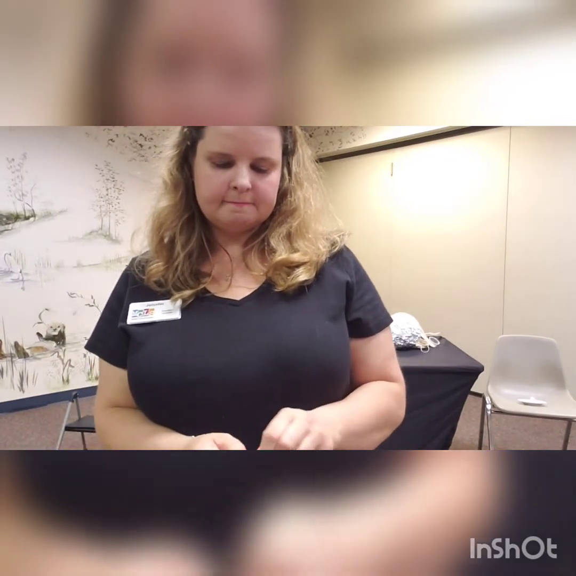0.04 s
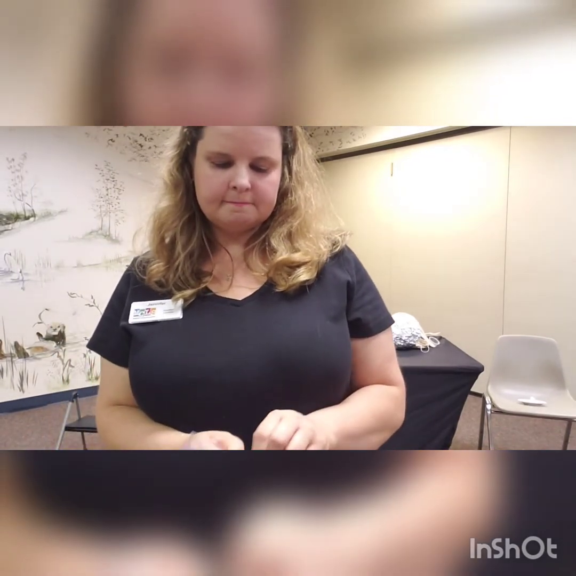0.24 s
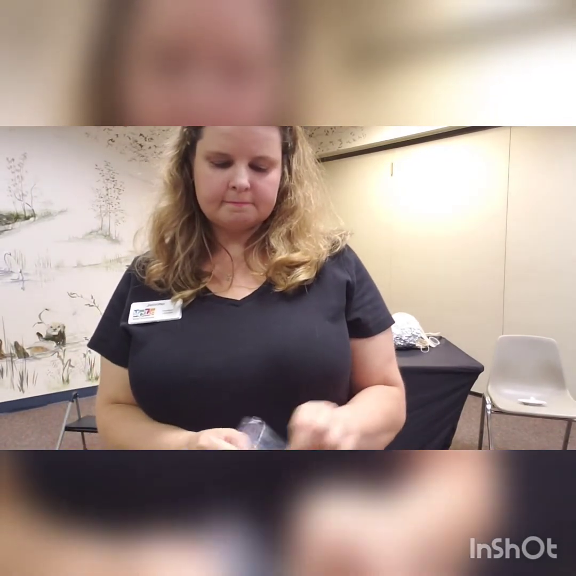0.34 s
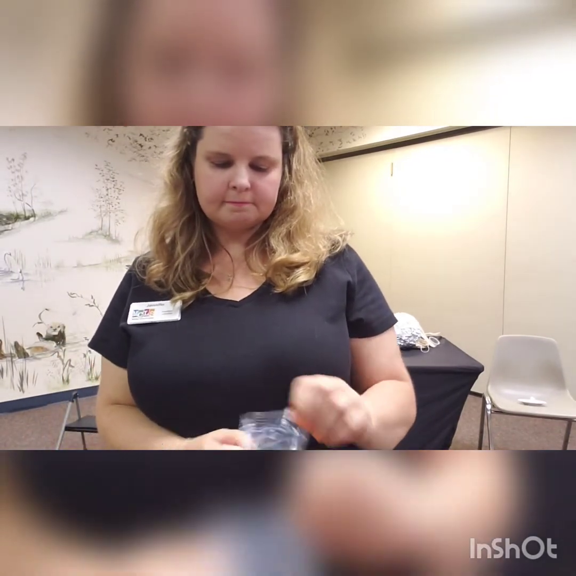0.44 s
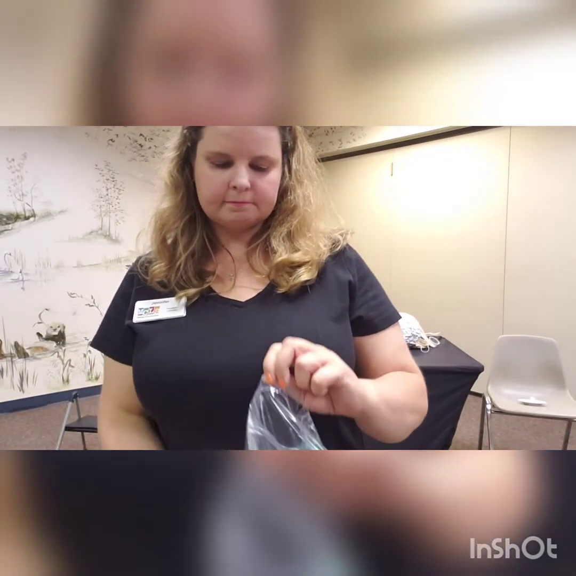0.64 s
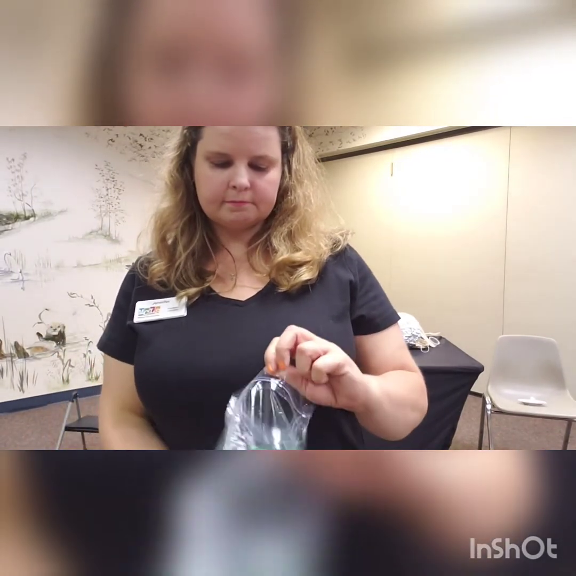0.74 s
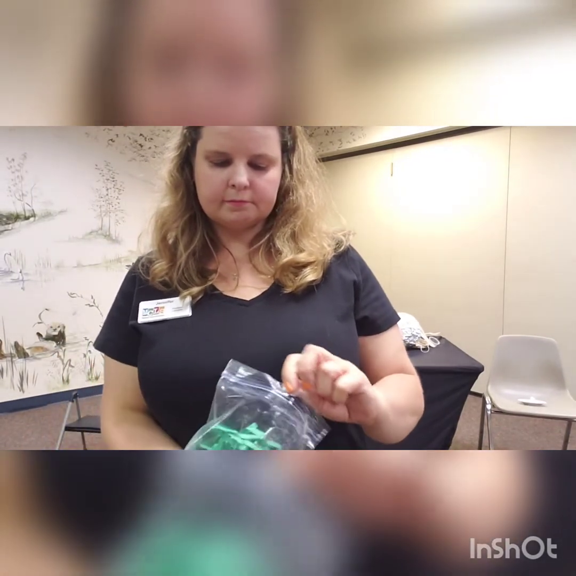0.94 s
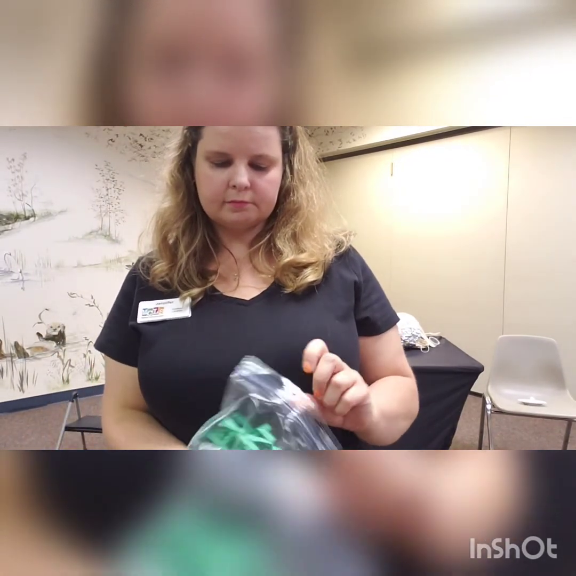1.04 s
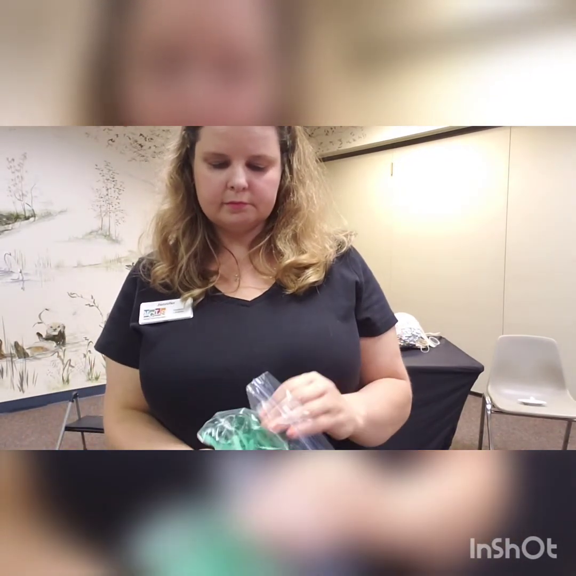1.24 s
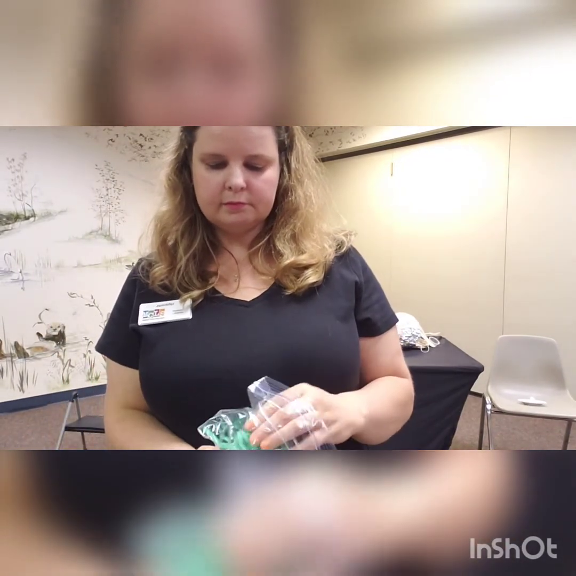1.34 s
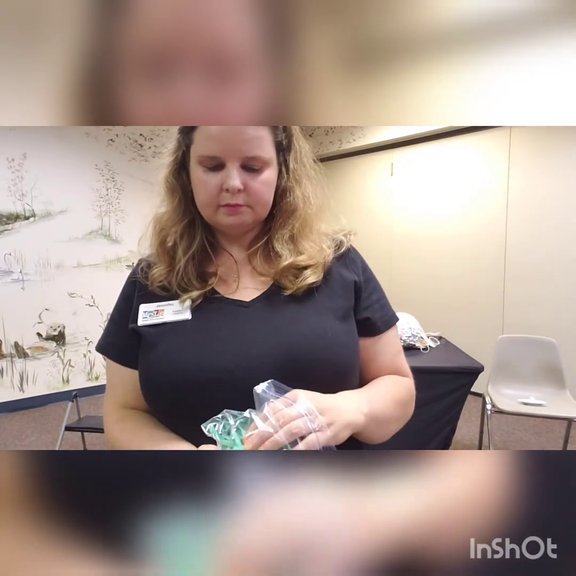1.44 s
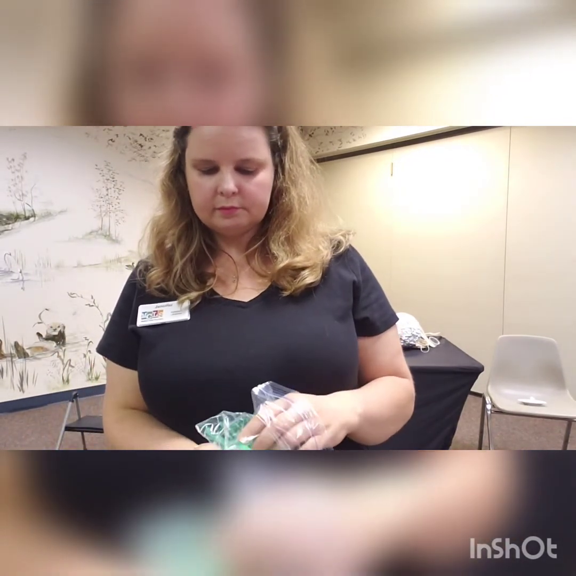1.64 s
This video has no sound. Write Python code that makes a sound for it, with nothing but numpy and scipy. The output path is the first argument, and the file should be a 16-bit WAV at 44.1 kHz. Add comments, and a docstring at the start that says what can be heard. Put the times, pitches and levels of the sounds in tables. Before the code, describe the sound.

A plastic bag is pulled open, its seal parting in a quick run of sharp snaps. Then a hand digs in, and the plastic crinkles over softly rustling shredded paper, close to the microphones in a small room.

```python
"""The seal of a plastic bag of shredded paper, pulled open by hand, parts in a quick run of sharp snaps.
Then a hand digs in: the film ticks, crinkles and squeaks over a soft rustle of paper strips.
The bag is close to a stereo pair of microphones, a little to the right, in a small room.
The room rings briefly and its ventilation rumbles underneath."""
import sys
import numpy as np
from scipy import signal
from scipy.fft import rfft, irfft, next_fast_len
from scipy.io import wavfile
from scipy.ndimage import map_coordinates

SR = 44100
rng = np.random.default_rng(int(sys.argv[2]) if len(sys.argv) > 2 else 0)


def transcribe(u):
    """Save the signal u as a 16-bit wav file named by the first command-line argument.

    u: samples, shape (n,) or (channels, n), limited to [-1, 1]; the rate is SR.
    q: integer samples, one column per channel.
    """
    v = np.clip(np.atleast_2d(u).T, -1, 1)
    q = np.round(v * 32767).astype(np.int16)
    wavfile.write(sys.argv[1], SR, q)


N = 74970

# rumble of the ventilation: f/Hz, level/dB
VENT_SPECTRUM = [(28, -26), (43, 2.5), (90, -1.5), (135, -6.5), (300, -19), (1500, -47.5), (4000, -53),
                 (7500, -44), (15000, -53)]
# reverberation time of the room: f/Hz, t60/s
ROOM_T60 = [(250, 0.53), (14000, 0.38)]
# how alike ventilation, room tail and bag are at the two microphones: f/Hz, likeness (1 = identical)
VENT_LIKENESS = [(60, 0.99), (250, 0.9), (5000, 0.16)]
ROOM_LIKENESS = [(500, 0.46), (1500, 0.62), (4000, 0.1)]
BAG_LIKENESS = [(500, 0.98), (1500, 0.55), (4000, 0.22), (12000, 0.2)]
# left microphone relative to the right: f/Hz, level/dB
LEFT_OVER_RIGHT = [(200, -1.45), (2300, -3), (8500, -4), (13000, 0.7)]
# a finger sliding on the film: t/s, f/Hz, level/dB
SQUEAK_GLIDE = [(1.58, 11900, -69.5), (1.635, 12830, -48.5), (1.69, 14400, -68)]
# fingers brushing the film: t/s, half length/s, level/dB
BRUSH_STROKES = [(1.245, 0.0095, -54), (1.343, 0.008, -58.5)]
# handling of bag and paper: t/s, body level/dB, hiss over body/dB
RUSTLE_LEVELS = [(0, -71.5, 0.5), (.18, -79.5, -4.5), (.738, -110, -15), (.752, -61.5, -2.5),
                 (.825, -57.5, 3.5), (.89, -58, 7), (.995, -69.5, 1), (1.02, -60, -1), (1.122, -81, 10.5),
                 (1.135, -65, -3), (1.16, -56.5, 3), (1.21, -63.5, 2.5), (1.25, -56, -0.5), (1.28, -70, 6),
                 (1.35, -62, 6), (1.49, -69.5, 6), (1.55, -70.5, 11.5), (1.61, -64.5, 10.5), (1.7, -58, 4)]
# low body and high hiss of the paper strips: f/Hz, level/dB
PAPER_BODY = [(60, -8.5), (135, 18.5), (330, 7), (600, 5), (950, 3), (1650, 5), (2400, -1), (3800, -13.5),
              (15000, -43)]
PAPER_HISS = [(500, -21.5), (2500, -4), (7000, -1), (10000, -6.5), (12500, 1), (15500, -4)]
# creases of the film flipping over: t/s, level/dB, treble/dB
CREASE_FLIPS = [(.0970, -49, 16), (0.4809, -17.5, -13.5), (.7480, -30.5, 10), (0.81, -20, -13),
                (0.8339, -34.5, 16), (0.876, -26, -9), (.9535, -27.5, 10), (1.0115, -19.5, -3.5),
                (1.0470, -36, 12.5), (1.2515, -24, 5.5), (1.2540, -27, -9), (1.3003, -31, 8),
                (1.5057, -39, 15), (1.5495, -35, 8.5), (1.5710, -33, 11.5), (1.6050, -31, -3)]
# colour of the film, slack and pulled taut: f/Hz, level/dB
SLACK_FILM = [(150, -11), (400, -3), (900, -5), (1600, -1), (14000, -4.5)]
TAUT_FILM = [(80, -31.5), (200, -12), (380, -5.5), (720, 0), (1150, -3.5), (2400, 0), (4500, -1.5),
             (15500, -5)]
# resonances of the bag, slack and pulled taut: f/Hz, level/dB, t60/s
SLACK_MODES = [(1580, -27, .02), (2350, -29, .025), (3650, -27, .012)]
TAUT_MODES = [(706, -58.5, 0.3), (2315, -37, 0.071)]
# fine crackle while the seal is pulled: t/s, level/dB
PULL_LEVELS = [(.190, -100), (.192, -53), (.202, -33), (.211, -52.5), (.225, -36.5), (.255, -47),
               (.287, -43), (.325, -71.5), (.362, -52.5), (.40, -35.5), (.44, -56), (.53, -51.5),
               (.6, -104)]
# the seal parting: t/s, level/dB, bass/dB, treble/dB
SEAL_SNAPS = [(.1963, -11, -19, 18.5), (.2023, 2.5, -5, 3), (.2040, 4, -4, -5.5), (.2083, -6, -3.5, 7),
              (.2304, -8.5, 0.5, 2.5), (.2686, -6, 7, -2), (.2712, -6.5, 8.5, 7), (.2892, 2, -13, -2.5),
              (.2963, -7, 3, 2), (.3101, -2.5, 3.5, 9), (.3123, -1.5, 5, -1.5), (.3160, -7, 5, -1.5),
              (.3340, -6, 2, 3), (.3413, -9.5, 9.5, 4.5), (.3537, -20, 5, -5.5), (.3630, -8.5, 0, 9.5),
              (.3729, -6, -6, -3), (.3839, -8, -2, -1), (.3912, -11.5, -11, 2.5), (.4213, -26.5, 9, 19)]

STRAIN_S, CRACK_S, QUIVER_S = 0.0012, 0.00032, 0.0027  # time constants of a bright click
STRAIN_DB, QUIVER_DB = -5.5, -1  # relative to the crack
DULL_RING = 0.15  # dB of extra ring for each dB of treble that a click lacks


def amp(db):
    """Decibels to gain."""
    return 10 ** (np.asarray(db) / 20)


def unit(x):
    """Scaled to rms 1."""
    return x / np.sqrt(np.mean(x ** 2) + 1e-20)


def along(points, hz):
    """(f/Hz, value) points read on a log frequency axis."""
    f, values = np.transpose(points)
    return np.interp(np.log(hz + 1), np.log(f + 1), values)


def curves(rows):
    """One value per sample for each column after the time."""
    times, *columns = np.transpose(rows)
    return [np.interp(np.arange(N) / SR, times, column) for column in columns]


def wobble(rate):
    """A smooth random curve, rate knots a second."""
    return map_coordinates(rng.standard_normal(N), [np.arange(N) * rate / SR])


def filtered(x, response):
    """x through a filter with the gain response(hz)."""
    n = x.shape[-1]
    size = next_fast_len(n + SR // 4)
    return irfft(rfft(x, size) * response(np.fft.rfftfreq(size, 1 / SR)), size)[..., :n]


def minimum_phase(db, size=2048):
    """The shortest impulse response with the gain db(hz)."""
    cepstrum = irfft(np.log(amp(db(np.fft.rfftfreq(size, 1 / SR)))))
    cepstrum[1:size // 2] *= 2
    cepstrum[size // 2 + 1:] = 0
    return irfft(np.exp(rfft(cepstrum)))


def spread(pair, likeness):
    """Two unrelated signals mixed to left and right with the given likeness."""
    turn = lambda hz: np.arccos(np.clip(along(likeness, hz), -1, 1)) / 2
    mid, side = filtered(pair, lambda hz: np.array([np.cos(turn(hz)), np.sin(turn(hz))]))
    return np.array([mid + side, mid - side])


def burst(decay_s, size=2048):
    """Two unrelated dying bursts starting mid-buffer, each with a flat spectrum and energy 1."""
    noise = rng.standard_normal((2, size)) * np.exp(-np.arange(size) / SR / decay_s)
    spectrum = rfft(np.pad(noise, ((0, 0), (size, 0))))
    return irfft(np.exp(1j * np.angle(spectrum)))


def narrow_noise(hz, width_hz):
    """Stereo noise of rms 1 in a band around hz (one value per sample)."""
    flutter = np.array([wobble(2 * width_hz) + 1j * wobble(2 * width_hz) for _ in range(2)])
    carrier = np.exp(2j * np.pi * np.cumsum(hz) / SR)
    return unit(spread(np.real(flutter * carrier), BAG_LIKENESS))


def ventilation(air_db=-52.5, hum_hz=45, hum_db=-60):
    """Room tone: a steady low rumble with a trace of hiss, and the fan's slightly unsteady hum."""
    air = spread(rng.standard_normal((2, N)), VENT_LIKENESS)
    rumble = unit(filtered(air, lambda hz: amp(along(VENT_SPECTRUM, hz))))
    hum = unit(np.sin(2 * np.pi * hum_hz * np.arange(N) / SR + wobble(2)))
    return amp(air_db) * rumble + amp(hum_db) * hum


def room(x, tail_db=-9.5, build_s=0.002, early_db=-16.5, reflections=8):
    """Table and walls send a few early reflections to the microphones, with a diffuse tail."""
    hz, t, noise = signal.stft(rng.standard_normal((2, SR * 3 // 4)), SR, nperseg=256)
    decay = amp(-60 * t / along(ROOM_T60, hz)[:, None])
    tail = signal.istft(noise * decay, SR, nperseg=256)[1]
    build_up = 1 - np.exp(-np.arange(tail.shape[1]) / SR / build_s)
    response = spread(tail, ROOM_LIKENESS) * build_up
    response *= amp(tail_db) / np.linalg.norm(response[0])
    for channel in response:
        arrivals = (rng.uniform(.002, .025, reflections) * SR).astype(int)
        channel[arrivals] += amp(early_db) / np.sqrt(reflections)
    return signal.fftconvolve(x, response, axes=1)[:, :N]


def finger_squeak():
    """Skin sticks and slips on the film: a thin, rising band of noise."""
    hz, level_db = curves(SQUEAK_GLIDE)
    sliding = np.arange(N) / SR > SQUEAK_GLIDE[0][0]
    return sliding * amp(level_db) * narrow_noise(hz, width_hz=1500)


def finger_brushes(centre_hz=5690):
    """Fingers brush the film: short, bright scrapes that swell and fade."""
    t = np.arange(N) / SR
    strokes = sum(amp(db) * np.exp(-((t - at_s) / half_s) ** 2) for at_s, half_s, db in BRUSH_STROKES)
    return strokes * narrow_noise(np.full(N, centre_hz), width_hz=1000)


def crackle(spectrum, per_s, scatter_db, clump_db):
    """Dense tiny cracks of uneven size that come in clumps, rms 1."""
    sizes = amp(scatter_db * np.minimum(rng.exponential(size=N), 3) + clump_db * wobble(90))
    hits = (rng.random(N) < per_s / SR) * sizes * rng.standard_normal((2, N))
    colour = minimum_phase(lambda hz: along(spectrum, hz))
    return unit(signal.fftconvolve(spread(hits, BAG_LIKENESS), colour[None], axes=1)[:, :N])


def film_clicks(rows, film, modes, pitch_scatter=0, ring_samples=8192):
    """The film strains, cracks and quivers, and the bag rings; dull clicks last longer and ring more."""
    out = np.zeros((2, N + SR))
    t = np.arange(ring_samples) / SR
    for at_s, db, bass_db, treble_db in rows:
        tone = [(600, bass_db), (1600, 0.032), (4000, 0.018), (11000, treble_db)]
        colour = minimum_phase(lambda hz: along(film, hz) + along(tone, hz))
        dull_db = max(-treble_db, 0)
        stretch = amp(dull_db)
        strain = amp(STRAIN_DB) * burst(STRAIN_S * stretch)[:, ::-1]  # a creak swelling into the crack
        motion = strain + burst(CRACK_S * stretch) + amp(QUIVER_DB) * burst(QUIVER_S)
        lead = motion.shape[1] // 2
        until_crack_s = np.arange(lead)[::-1] / SR
        motion[:, :lead] *= np.exp(-(until_crack_s / (2 * STRAIN_S * stretch)) ** 2)
        click = signal.fftconvolve(spread(motion, BAG_LIKENESS), colour[None], axes=1)
        tuning = np.exp(pitch_scatter * rng.standard_normal())  # a fold's size sets its pitch
        ring = np.zeros(ring_samples)
        for hz, mode_db, t60 in modes:
            envelope = amp(mode_db + DULL_RING * dull_db - 60 * t / t60)
            ring += envelope * np.sin(2 * np.pi * tuning * hz * t + rng.uniform(0, 2 * np.pi))
        at = round(at_s * SR)
        out[:, at - lead:at - lead + click.shape[1]] += amp(db) * click
        out[:, at:at + ring_samples] += amp(db) * ring
    return out[:, :N]


def digging():
    """Paper strips rub on each other and on the slack film, whose creases tick."""
    body_db, bright_db = curves(RUSTLE_LEVELS)
    body = amp(body_db) * crackle(PAPER_BODY, per_s=4700, scatter_db=0, clump_db=1.5)
    hiss = amp(body_db + bright_db) * crackle(PAPER_HISS, per_s=8400, scatter_db=5, clump_db=2.5)
    creases = [(at_s, db, 0, treble_db) for at_s, db, treble_db in CREASE_FLIPS]
    return body + hiss + film_clicks(creases, SLACK_FILM, SLACK_MODES, pitch_scatter=.07)


def seal():
    """The seal lets go bit by bit: the taut film snaps, with fine crackle in between."""
    pull_db, = curves(PULL_LEVELS)
    snaps = film_clicks(SEAL_SNAPS, TAUT_FILM, TAUT_MODES)
    return snaps + amp(pull_db) * crackle(TAUT_FILM, per_s=9000, scatter_db=3, clump_db=2.5)


def scene(left_lag_s=.00008):
    """The bag close up in the small room; its sound reaches the right microphone first."""
    bag = seal() + digging() + finger_brushes() + finger_squeak()
    delays_s = left_lag_s * np.array([[.5], [-.5]])
    direct = filtered(bag, lambda hz: np.exp(-2j * np.pi * hz * delays_s))
    return direct + room(bag) + ventilation()


def record(dry, ceiling=.36, top_hz=16100):
    """The two microphones differ slightly in colour; sharp peaks are rounded and the very top is cut."""
    heard = filtered(dry, lambda hz: amp(along(LEFT_OVER_RIGHT, hz) * np.array([[.5], [-.5]])))
    rounded = heard / (1 + (heard / ceiling) ** 4) ** .25
    return filtered(rounded, lambda hz: np.clip((top_hz - hz) / 600 + .5, 0, 1) ** 2)


dry = scene()
out = record(dry)
transcribe(out)
```